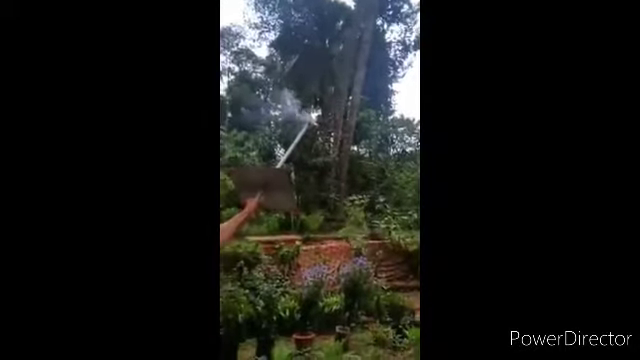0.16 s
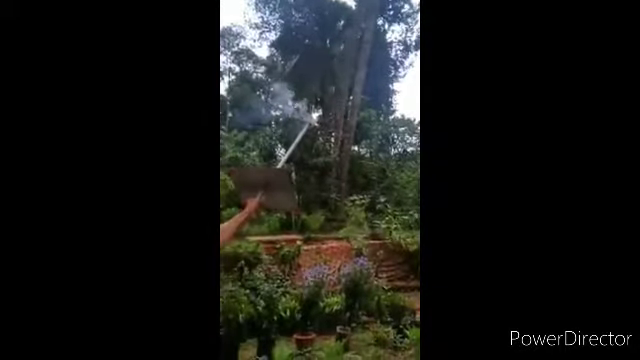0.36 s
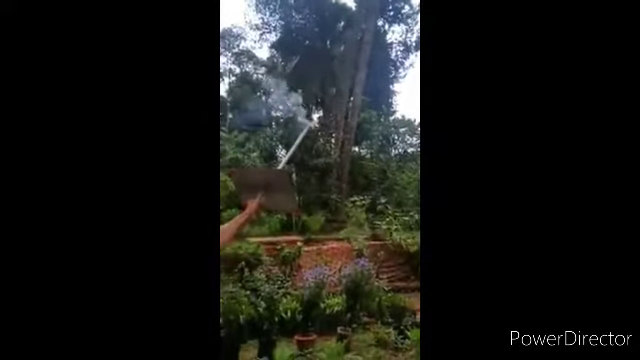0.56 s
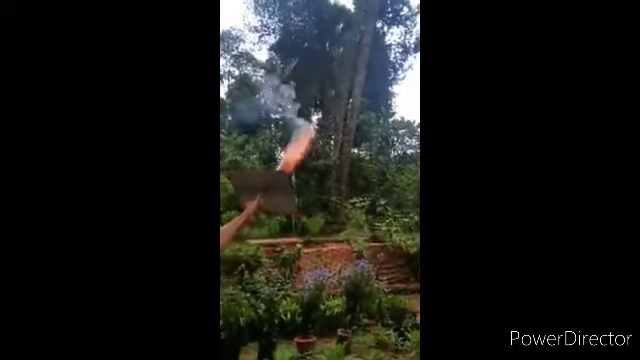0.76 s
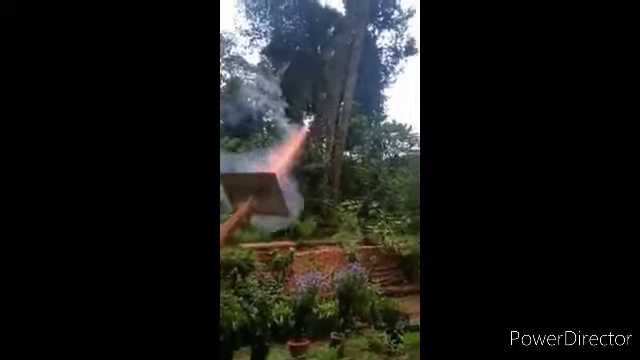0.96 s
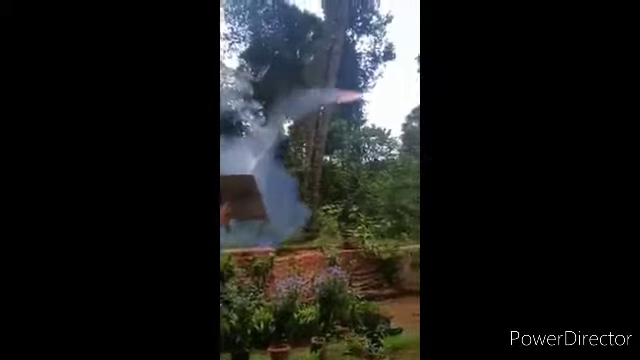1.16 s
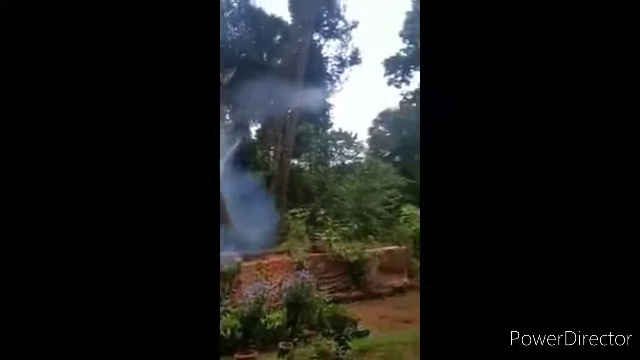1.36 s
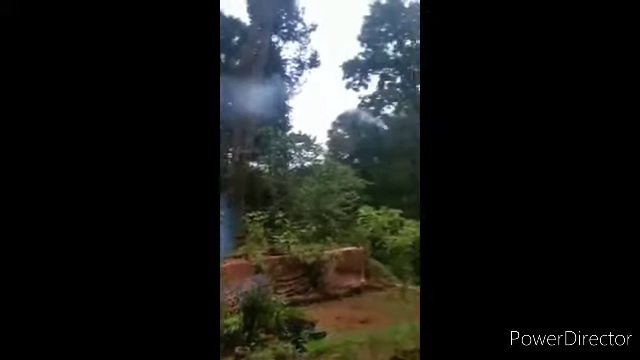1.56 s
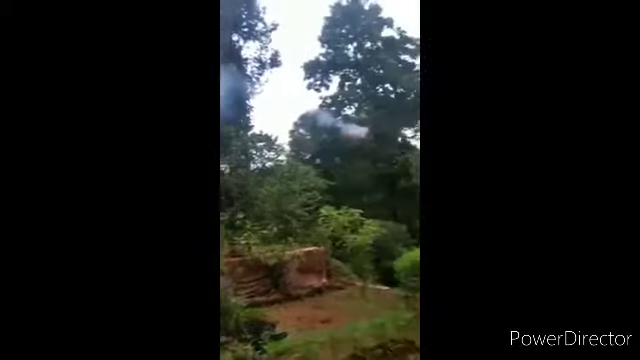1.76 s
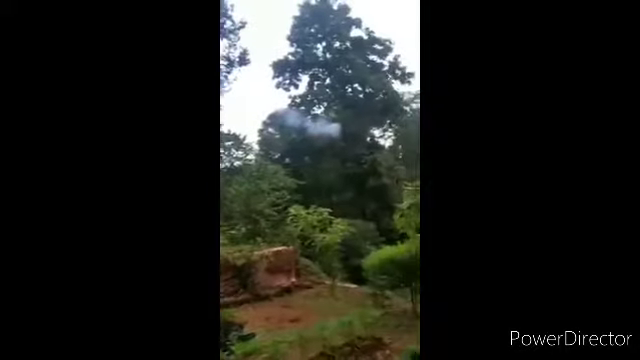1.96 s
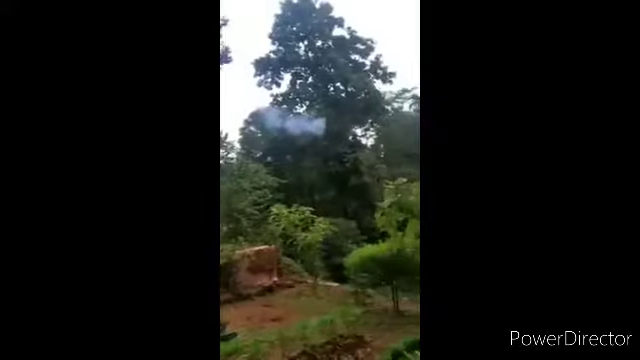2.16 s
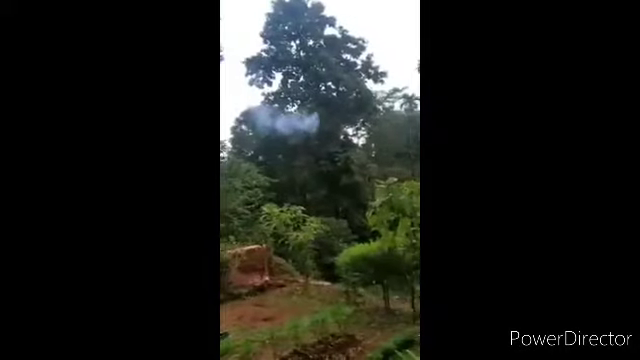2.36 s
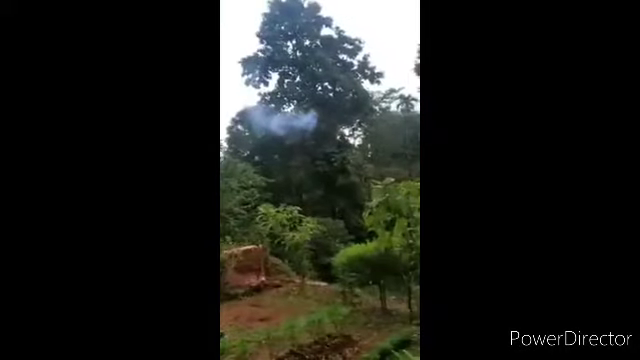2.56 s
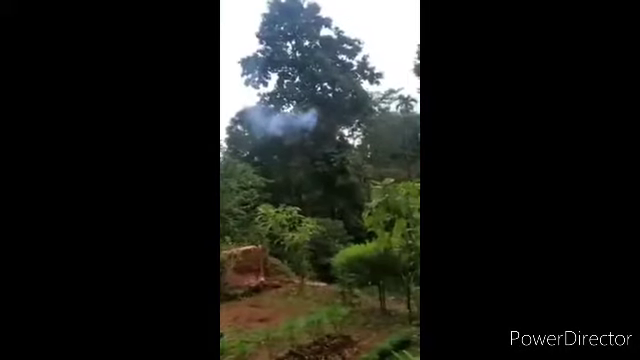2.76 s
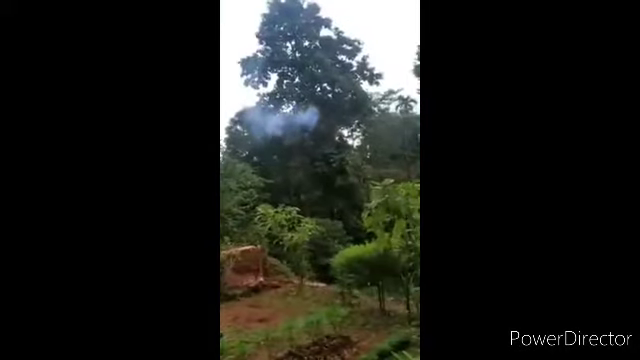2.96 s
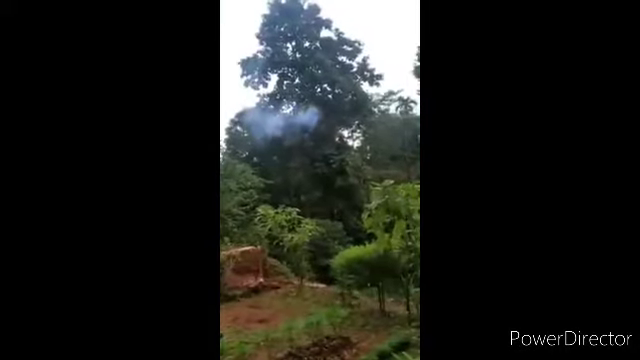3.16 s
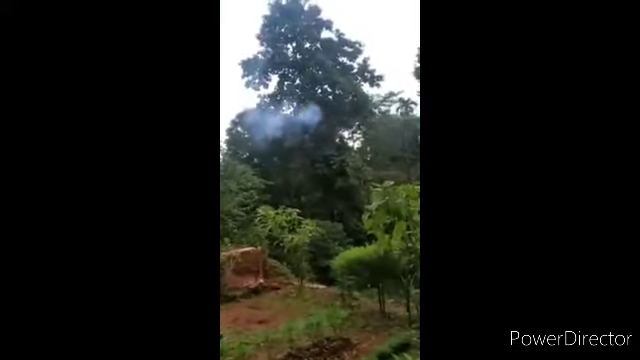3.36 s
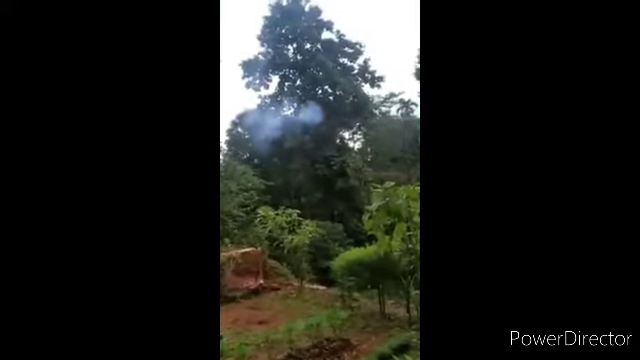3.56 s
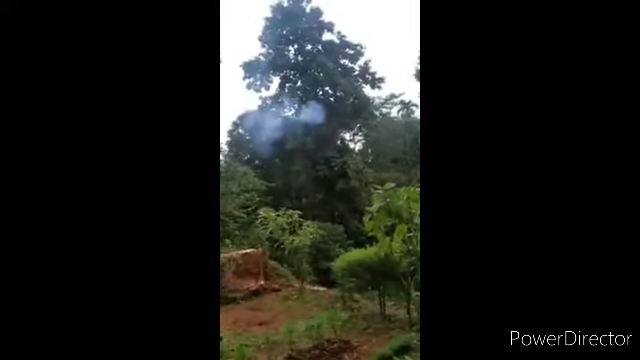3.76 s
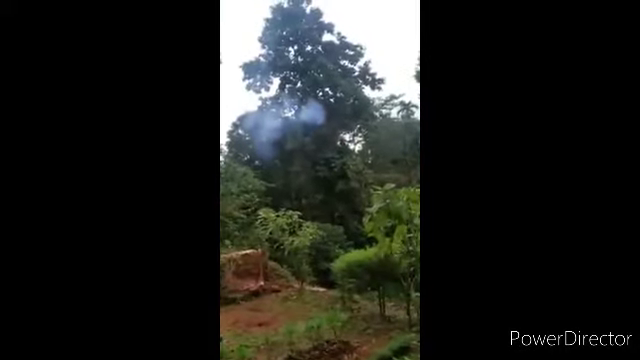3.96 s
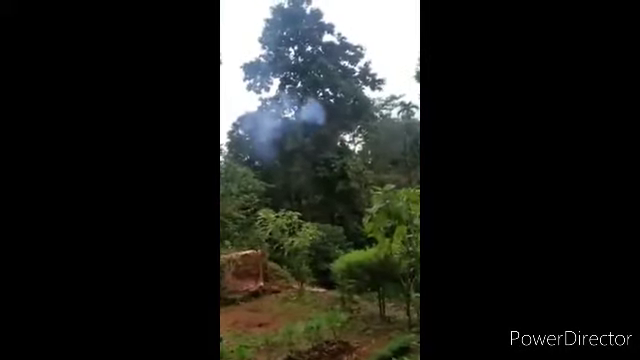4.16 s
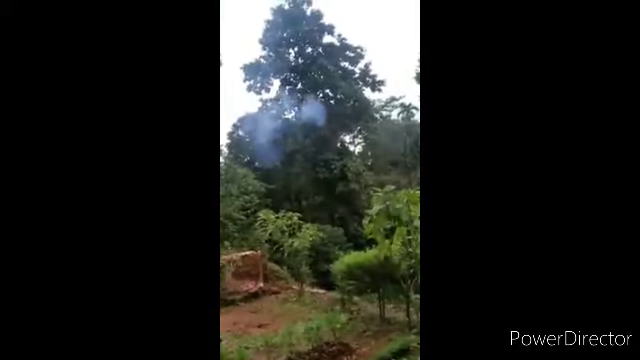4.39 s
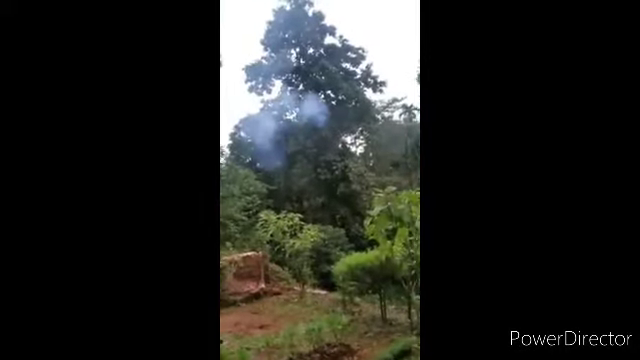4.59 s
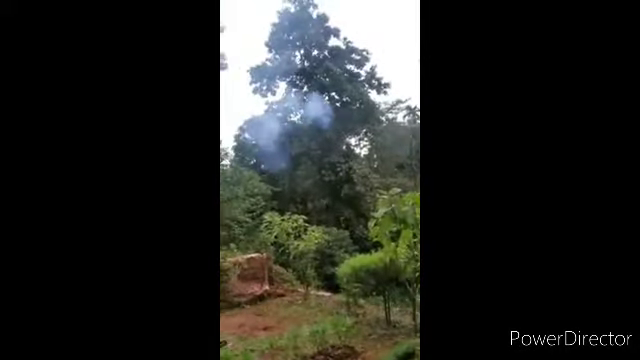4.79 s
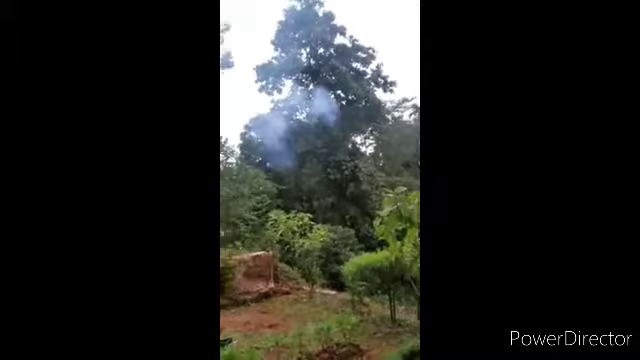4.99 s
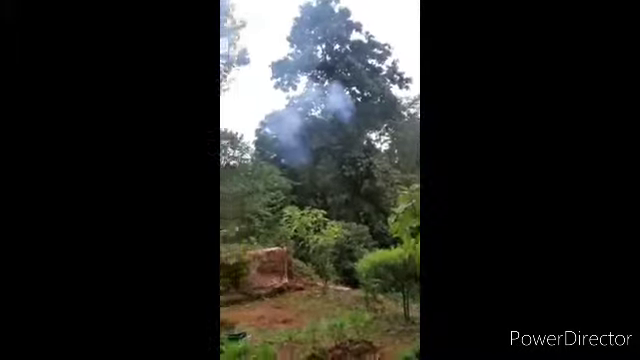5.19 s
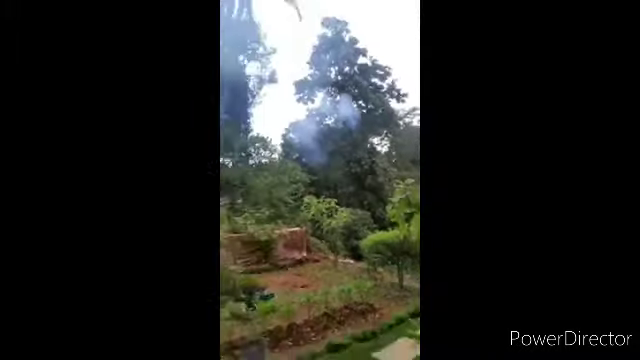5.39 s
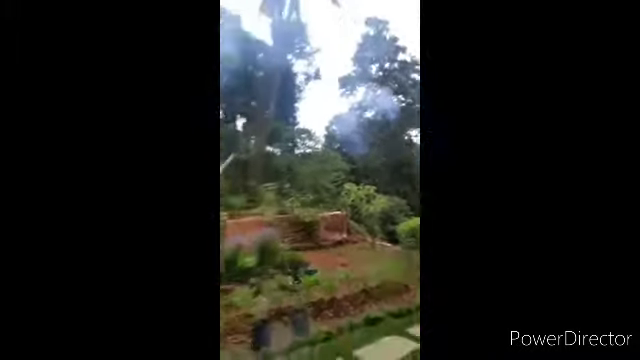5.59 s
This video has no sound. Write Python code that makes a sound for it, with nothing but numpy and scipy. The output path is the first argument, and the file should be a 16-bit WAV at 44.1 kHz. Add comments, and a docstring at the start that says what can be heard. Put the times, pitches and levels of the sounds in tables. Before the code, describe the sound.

A rocket launches from a pipe with a pop and hiss, then explodes loudly, echoing among trees while insects keep buzzing.

```python
"""Insects shrill in a wooded garden, and a hand gives the camera a few soft knocks.
A firework's fuse spits in a hand-held pipe; the motor pops alight and the rocket hisses away.
It bursts above the trees with a bang that overloads the microphones, and the forest scatters it
into a long, darkening roll. The insects sing on; near the end come two more knocks and a nail's tap."""
import sys
import numpy as np
from scipy import signal
from scipy.fft import rfft, irfft, next_fast_len
from scipy.io import wavfile
from scipy.ndimage import uniform_filter1d, map_coordinates

SR = 44100
rng = np.random.default_rng(int(sys.argv[2]) if len(sys.argv) > 2 else 0)


def inscribe(sig):
    """Save sig as 16-bit PCM at rate SR to the path in sys.argv[1].

    A 1-D sig is mono; a 2-D sig holds one channel per row.
    Samples are clipped to [-1, 1] before scaling.
    """
    pcm = np.round(np.clip(np.atleast_2d(sig).T, -1, 1) * 32767)
    wavfile.write(sys.argv[1], SR, pcm.astype(np.int16))


N = 248569
TIME = np.arange(N) / SR
LIGHT_S, BURST_S = 1.114, 1.9996  # the motor lights, the rocket bursts

# Tone colours, from low to high pitch; only the shape counts: (f/Hz, level/dB)
INSECT_TONE = [(1200, -22.5), (1600, -12.5), (1950, -4.5), (2400, 1), (3100, 2.5), (3700, 0), (5000, -0.7),
               (6000, -6), (6700, -13), (7800, -18.5), (8600, -39.5), (10200, -17.5), (11200, -24.5),
               (13700, -27.5), (15000, -48)]
LEAF_TONE = [(4000, -21), (7500, 0), (8600, -14), (10200, -1.5), (13000, -7.5), (14200, -14.5),
             (15400, -30)]
AIR_TONE = [(20, 0.5), (44, -5.5), (65, -10), (100, -6), (160, -13.5), (300, -26.5), (700, -30),
            (1500, -25), (4000, -56.5)]
SKIN_TONE = [(30, 11.5), (110, 3), (250, -7.5), (600, -11.5), (1100, -25), (2000, -24.5), (4000, -39),
             (15000, -69.5)]
SMOULDER_TONE = [(200, -20), (480, -6), (660, -11), (820, 2.5), (1000, -9), (1300, -5), (3000, -8),
                 (8000, -30)]
SPIT_TONE = [(3000, -33), (7000, 5), (9000, 4), (10500, 13), (13000, 10), (15500, -8)]
GAS_TONE = [(90, -15), (250, 0), (700, -4), (1600, -1), (3000, -5), (7000, -1.5), (12000, -14)]
PIPE_TONE = [(50, -18), (110, -8), (190, 4.5), (280, 0), (500, 0), (1200, -8), (3000, -1), (6000, -15),
             (15000, -14)]
HISS_TONE = [(2500, -30.5), (4000, -11), (5600, -2.5), (7000, 0.5), (8600, -1), (10500, -2), (11500, -6.5),
             (13000, -3), (15400, -5.5)]
ROAR_TONE = [(50, -25), (130, -8), (300, -4), (700, 0), (1200, 2.5), (2000, 4.5), (2800, 6), (4000, 4.5),
             (5200, 2), (7000, -8.5), (11000, -30.5)]
RIP_TONE = [(300, -9), (1100, 13), (2200, -3), (5000, -2), (9000, -6), (13000, -14), (15000, -24)]
FOREST_TONE = [(25, -21), (60, -18), (120, -11), (220, -6), (400, -4.3), (650, -3), (1050, -6.2),
               (1500, -10.8), (2700, -10.2), (4300, -13), (6000, -14), (7800, -16.5), (9200, -18),
               (13000, -23.5), (14600, -29), (15300, -46)]
GROUND_TONE = [(25, 0.5), (60, -12), (95, 2.5), (300, -2), (1200, -6.5), (2200, -17.5), (12000, -33.5)]
HILL_TONE = [(30, -19.5), (100, -7), (300, -4), (600, -9), (1100, -19.5), (2200, -35), (12000, -80.5)]
TREE_LINE_TONE = [(100, -18.5), (300, 2), (680, 10.5), (1150, -2.5), (2200, -5.5), (6000, -30.5),
                  (14000, -39)]
BOOM_TONE = [(30, -17.5), (60, -4.5), (90, 0), (135, -2), (220, -17), (500, -50)]
NAIL_TONE = [(100, 2), (700, 7), (1500, -4), (5000, -21), (10000, -7), (15000, -15)]
# How wide sounds seem, as the side signal's level against the middle's: (f/Hz, level/dB)
GARDEN_WIDTH = [(40, -16.5), (200, -17.5), (1000, -5), (2700, 1), (5000, -0.5)]
JET_WIDTH = [(150, -30), (700, -7.5), (1300, 0), (2500, 0), (3400, 7), (4500, 7), (6200, -1), (9000, -1.5),
             (15000, 0)]
ECHO_WIDTH = [(50, -14), (125, -20), (220, -18), (380, -13), (700, -8), (1200, -3), (2200, 0), (4500, 1),
              (9000, -1.5), (14000, -1)]

# The insects' shrill notes: (f/Hz, width/Hz, relative level/dB)
SHRILL_NOTES = [(2762, 30, -2), (3048, 22, -11)]
# The shrill notes, or the whole chorus, swell briefly: (t/s, half length/s, boost/dB)
NOTE_SWELLS = [(.05, 0.04, 3.5), (2.79, .03, 4.5), (3.83, .1, 3.5), (4.591, 0.03, 5.5), (5.173, 0.045, 6)]
CHORUS_SWELLS = [(3.96, 0.047, 2), (4.79, .11, 2.3), (5.255, 0.049, 5)]
# Leaves stir close by: (t/s, level/dB)
LEAF_STIRS = [(.06, -56.5), (3.31, -54.5), (3.9, -62), (4.88, -60.5)]
# A faint deep drone comes and goes: (t/s, half length/s)
DRONE_SWELLS = [(0.324, 0.066), (0.547, 0.1), (1.8, 0.16), (3.044, 0.19), (4.28, 0.16), (5.348, 0.074),
                (5.58, 0.12)]
# Knocks on the camera: (t/s, relative level/dB, push length/s)
KNOCKS = [(0.071, -33, .004), (0.157, -20.5, 0.0023), (4.428, -30.5, 0.0052), (4.837, -28.5, 0.0063)]
# The hand lies nearer the right microphone; rows are left and right: (gain/dB)
HAND_BALANCE = [
    [-17.5],
    [5.3],
]
# The fuse flares: (t/s, half length/s, boost/dB)
FUSE_FLARES = [(0.983, 0.015, 1), (1.1, .016, 4)]
# The motor catches in the pipe: (t/s, level/dB, time to fade 60 dB/s)
COUGHS = [(1.093, -29.5, 0.17), (1.114, -26, 0.25)]
# The rocket gains thrust, then draws away: (t/s, relative hiss level/dB, relative roar level/dB)
EXHAUST_LEVELS = [(1.14, -31.5, -34.5), (1.184, -29, -35.5), (1.234, -23, -28.5), (1.404, -18, -26.5),
                  (1.554, -18, -25), (1.624, -22.5, -29.5), (1.658, -20, -30), (1.704, -25.5, -32),
                  (1.975, -33.5, -39)]
# Ground and terrace walls reflect the shock: (delay/s, level against the direct shock/dB)
WALL_ECHOES = [(.0032, 4.5), (.004, 3), (.0117, -10), (.032, -6)]
# The forest's echo holds (f/Hz, time at full strength/s), then dies (f/Hz, time to fade 60 dB/s)
FOREST_HOLD = [(40, 0.036), (120, 0.16), (300, 0.24), (700, 0.31), (2000, 0.24), (5000, 0.23),
               (12000, 0.21)]
FOREST_FADE = [(40, 1.5), (150, 1.65), (500, 1.4), (1000, 1.3), (2000, 1.15), (5000, .92), (8000, .85),
               (12000, .62)]
# Echoes from tall trees, and deep booms under them: (t/s, half length/s, level/dB)
TREE_ECHOES = [(2.27, 0.071, -20.5), (2.367, 0.015, -27.5), (2.5, 0.022, -36), (2.61, 0.071, -36),
               (2.85, 0.15, -41.5), (3.187, 0.032, -46.5)]
BOOMS = [(2.15, .04, -33.5), (2.245, 0.025, -33.5), (2.34, 0.031, -35), (2.49, 0.021, -38)]
# The notes the camera's shell rings with: (f/Hz, relative level/dB, time to fade 60 dB/s)
SHELL_NOTES = [(150, -22, 0.06), (604, 2.5, 0.011), (794, -12, 0.04), (1420, 1, 0.0035), (9600, -22, .008)]
# The microphone openings lift or dip some pitches: (f/Hz, width/Hz, gain/dB)
MIC_COLOUR = [(1180, 130, 1.5), (2750, 300, 1.5), (6650, 170, -2), (7980, 200, 2), (8550, 300, -2),
              (11500, 500, -2)]


def amp(db):
    """Turn decibels into a gain."""
    return 10 ** (np.asarray(db) / 20)


def unit(x):
    """Scale a signal to an average power of 1."""
    return x / np.sqrt(np.mean(x ** 2) + 1e-20)


def along(points, hz):
    """Read between the rows of a (frequency, value) table, on a log scale of frequency."""
    f, values = np.transpose(points)
    return np.interp(np.log(hz + 1), np.log(f + 1), values)


def wobble(rate):
    """A smooth curve through `rate` random points a second."""
    return map_coordinates(rng.standard_normal(int(N * rate / SR) + 4), [TIME * rate])


def swell(s, half, flatness=4):
    """A rounded hump of height 1, centred on time s."""
    return np.exp(-((TIME - s) / half) ** flatness)


def boost_db(rows):
    """Add up brief rises in level."""
    return sum(db * swell(s, half) for s, half, db in rows)


def peak(s, rise, fall):
    """A gain that climbs to 1 at time s, then drops; rise and fall are in dB a second."""
    return amp(-rise * np.maximum(s - TIME, 0) - fall * np.maximum(TIME - s, 0))


def push(s, length, rise):
    """A pressure wave: a steep push, then a longer suction."""
    age = np.maximum(TIME - s, 0)
    return (1 - age / length) * np.exp(-age / length) * (1 - np.exp(-age / rise))


def filtered(x, response):
    """Give each frequency in x its own gain."""
    size = next_fast_len(N + SR // 2)
    return irfft(rfft(x, size) * response(np.fft.rfftfreq(size, 1 / SR)), size)[..., :N]


def shaded(x, gain):
    """Give x a gain that depends on both frequency and time."""
    hz, t, spectrum = signal.stft(x, SR, nperseg=512)
    return signal.istft(spectrum * gain(hz[:, None], t[None]), SR, nperseg=512)[1][:, :N]


def noise(tone, width, flicker=1):
    """Left and right noise with a given tone colour and width, at an average power of 1."""
    def colour(hz):
        side = amp(along(width, hz))
        return amp(along(tone, hz)) * np.array([np.ones_like(side), side]) / np.hypot(1, side)
    mid, side = filtered(rng.standard_normal((2, N)) * flicker, colour)
    return unit(np.array([mid + side, mid - side]))


def shrill(hz, width, drift_hz=18, trill_hz=26, trill_db=2, count=4):
    """A few insects on nearly one pitch, each wandering and chirping at its own uneven pace."""
    voices = np.zeros((2, N))
    for _ in range(count):
        pitch = hz + drift_hz * wobble(9) + .7 * width * wobble(90)
        pulses = np.sin(2 * np.pi * np.cumsum(trill_hz * (1 + .3 * wobble(8))) / SR)
        mic_phase = rng.normal(0, 0.57, (2, 1))
        loudness = amp(trill_db * pulses + 1.5 * wobble(21) + 3.2 * wobble(220))
        voices += loudness * np.sin(2 * np.pi * np.cumsum(pitch) / SR + mic_phase)
    return unit(voices)


def buzz(hz=2750, width_hz=110, db=-52, ease_db_per_s=1.5):
    """Many far insects blur into one narrow buzz that slowly eases off."""
    band = filtered(rng.standard_normal((2, N)), lambda f: 1 / (1 + ((f - hz) / width_hz) ** 4))
    return amp(db - ease_db_per_s * TIME) * unit(band)


def insects(chorus_db=-39, ease_db_per_s=0.67, shrill_db=-47.5):
    """A far, blended chorus surges now and then, with two shrill notes standing out of it."""
    level_db = chorus_db - ease_db_per_s * TIME + boost_db(CHORUS_SWELLS)
    chorus = amp(level_db + 1.01 * wobble(45)) * noise(INSECT_TONE, GARDEN_WIDTH)
    notes = sum(amp(db) * shrill(hz, width) for hz, width, db in SHRILL_NOTES)
    return chorus + buzz() + amp(shrill_db + boost_db(NOTE_SWELLS) - 0.1 * wobble(6.8)) * notes


def garden(air_db=-63, drone_db=-52.5, drone_hz=43):
    """Leaves stir quickly and settle slowly, over low moving air and a faint deep drone."""
    stirring = sum(amp(db) * peak(s, rise=130, fall=34.5) for s, db in LEAF_STIRS)
    leaves = stirring * amp(2.1 * wobble(40)) * noise(LEAF_TONE, GARDEN_WIDTH)
    air = amp(air_db + 1.2 * wobble(7.2)) * noise(AIR_TONE, GARDEN_WIDTH)
    drone_gain = amp(drone_db) * sum(swell(s, half) for s, half in DRONE_SWELLS)
    drone = drone_gain * np.sin(2 * np.pi * drone_hz * TIME + .5 * wobble(9.8))
    return leaves + air + drone


def hand(dull_hz=420, softness=0.78):
    """Fingers shift on the camera: dull knocks, with a rub of skin that grows around each one."""
    pushes = sum(amp(db) * push(s, length, softness * length) for s, db, length in KNOCKS)
    knocks = filtered(pushes, lambda f: 1 / (1 + 1j * f / dull_hz - (f / dull_hz) ** 2))
    shifting = sum(peak(s, rise=50, fall=50) for s, _, _ in KNOCKS)
    rub_gain = (amp(-72) + amp(-68) * shifting) * amp(2.8 * wobble(32))
    return knocks + rub_gain * noise(SKIN_TONE, GARDEN_WIDTH)[0]


def fuse(spit_s=0.97, spit_db=-44.5, smoulder_db=-57):
    """The fuse smoulders in the pipe, then spits thinly and flares twice as the motor takes over."""
    burning = peak(spit_s, rise=260, fall=0) * peak(LIGHT_S, rise=0, fall=150)
    flicker_db = boost_db(FUSE_FLARES) + .8 * wobble(89.7) + 1.3 * wobble(900)
    spit = burning * amp(spit_db + flicker_db) * noise(SPIT_TONE, JET_WIDTH)
    smoulder = amp(smoulder_db) * peak(LIGHT_S, rise=22, fall=150) * noise(SMOULDER_TONE, ECHO_WIDTH)
    return spit + smoulder


def ignition(gas_db=-38.5, pop_db=-14, rise_s=0.0017):
    """Gas wells up, the motor coughs twice, and a pressure wave pops out of the pipe."""
    gas = amp(gas_db) * swell(1.088, half=.042, flatness=2) * noise(GAS_TONE, ECHO_WIDTH)
    coughs = sum(amp(db) * peak(s, rise=0, fall=60 / fade_s) * np.clip((TIME - s) / rise_s, 0, 1)
                 for s, db, fade_s in COUGHS)
    pop = amp(pop_db) * push(LIGHT_S + rise_s / 2, length=.0004, rise=.00004)
    return gas + pop + coughs * noise(PIPE_TONE, ECHO_WIDTH)


def jet(gain_db=3, sputter_db=1.0, rasp_db=0.7, patchy_db=2.5):
    """The swirling exhaust hisses and roars, sputtering finely, until the burst ends it."""
    def eddies(hz, t):
        patches = rng.standard_normal((hz.size, t.size))
        patches = uniform_filter1d(patches, size=2, axis=0)
        patches = uniform_filter1d(patches, size=6, axis=1)
        return amp(patchy_db * unit(patches))
    alight = amp(gain_db) * peak(LIGHT_S, rise=1200, fall=0) * peak(BURST_S, rise=0, fall=300)
    s, hiss_db, roar_db = np.transpose(EXHAUST_LEVELS)
    hiss = amp(np.interp(TIME, s, hiss_db)) * noise(HISS_TONE, JET_WIDTH)
    roar = amp(np.interp(TIME, s, roar_db) + rasp_db * wobble(260)) * noise(ROAR_TONE, JET_WIDTH)
    sputter = amp(0.03 * wobble(46) + sputter_db * wobble(1200))
    return shaded((hiss + roar) * alight * sputter, eddies)


def add_bounces(x, share=0.24, count=4):
    """Ground and terrace walls add weak copies that lag more and more as the rocket climbs."""
    lag = .0035 + .0008 * np.maximum(TIME - LIGHT_S, 0)
    copies = np.zeros((2, N))
    for stretch in rng.uniform(1, 3.5, count):
        copies += [map_coordinates(channel, [(TIME - stretch * lag) * SR]) for channel in x]
    return (x + share * copies) / np.sqrt(1 + count * share ** 2)


def crack(db=-8.5, fade_s=.049, early_s=.001, rise_s=0.00088):
    """The rocket's casing tears open with a short, bright rip."""
    age = np.maximum(TIME - BURST_S + early_s, 0)
    shape = np.clip(age / rise_s, 0, 1) * amp(db - 60 * age / fade_s)
    return shape * noise(RIP_TONE, ECHO_WIDTH)


def blast(gain_db=6.5, bark_hz=900, mic_lag_s=0.00017):
    """The shock wave and its echoes off walls and trunks reach the two microphones a little apart."""
    def colour(f):
        bark = 1j * f * bark_hz / (bark_hz ** 2 - f * f + 1j * f * bark_hz)  # a hard middle range
        treble_cut = 1 / (1 + 1j * f / 4200) / (1 + 1j * f / 9000)
        bass_cut = 1j * f / (105 + 1j * f)
        return (1 + 1.3 * bark) * treble_cut * bass_cut
    direct = [(0.0007, 0)]
    trunks = [(delay, -18) for delay in rng.uniform(0.0042, 0.029, 6)]
    waves = np.zeros((2, N))
    for delay, db in direct + list(WALL_ECHOES) + trunks:
        lag = mic_lag_s * rng.uniform(-1.1, 1)
        pair = [push(BURST_S + delay + side * lag, length=0.00058, rise=0.00033) for side in (1, -1)]
        waves += amp(gain_db + db) * np.array(pair)
    return filtered(waves, colour)


def mic_thump(db=-18):
    """A deep, one-sided thump as the shock presses on the right microphone's opening."""
    return np.array([np.zeros(N), -amp(db) * push(BURST_S, length=.04, rise=.002)])


def echoes(forest_db=-14.5, ground_db=-10, ground_fade_s=0.26, hills_db=-31, hills_fade_s=4.52):
    """The ground thuds, far slopes roll, and countless trunks and leaves return the bang."""
    def dying(hz, t):
        # The treble comes from the nearer trees and dies first.
        overdue = t - BURST_S - along(FOREST_HOLD, hz)
        fading_s = np.logaddexp(0, overdue / .03) * .03  # eases from holding into fading
        return amp(-60 * fading_s / along(FOREST_FADE, hz))
    age = np.maximum(TIME - BURST_S, 0)
    clumps = amp(1.4 * wobble(900) + .7 * wobble(70))  # echoes overlap in small, quick bunches
    build_up_db = -6 * np.exp(-age / 0.021)
    forest = shaded(noise(FOREST_TONE, ECHO_WIDTH, clumps), dying) * amp(forest_db + build_up_db)
    ground = noise(GROUND_TONE, ECHO_WIDTH) * amp(ground_db - 60 * age / ground_fade_s)
    hills = noise(HILL_TONE, ECHO_WIDTH) * amp(hills_db - 60 * age / hills_fade_s + wobble(6.1))
    return (forest + ground + hills) * np.clip(age / 0.0024, 0, 1)


def tree_line():
    """Each stand of tall trees sends back a hollow swell, weaker from farther off, over deep booms."""
    def swells(rows):
        return sum(amp(db) * swell(s, half, flatness=2) for s, half, db in rows)
    hollow = amp(1.4 * wobble(160)) * swells(TREE_ECHOES) * noise(TREE_LINE_TONE, ECHO_WIDTH)
    return hollow + swells(BOOMS) * noise(BOOM_TONE, ECHO_WIDTH)


def nail_tap(s=4.9042, tick_fade_s=0.053):
    """A fingernail brushes the camera's shell, then clicks on it and makes it ring briefly."""
    age = np.maximum(TIME - s, 0)
    ring = sum(amp(db - 60 * age / fade_s) * np.sin(2 * np.pi * hz * age)
               for hz, db, fade_s in SHELL_NOTES)
    brush = amp(-53) * peak(s, rise=220, fall=220)
    tick = (age > 0) * amp(-45 - 60 * age / tick_fade_s)
    return amp(-26.5) * ring + (brush + tick) * noise(NAIL_TONE, GARDEN_WIDTH)[0]


def scene(left_lead_s=.00007):
    """Mix launch, bang, garden and hand; the echoes reach the left microphone a little sooner."""
    launch = fuse() + ignition() + add_bounces(jet())
    bang = blast() + mic_thump() + crack()
    sides = np.array([[1], [-1]])
    roll = filtered(echoes() + tree_line(), lambda hz: np.exp(1j * np.pi * hz * left_lead_s * sides))
    background = garden() + insects()
    handling = (hand() + nail_tap()) * amp(HAND_BALANCE)
    return launch + bang + roll + background + handling


def record(dry, ceiling=0.84, top_hz=15500):
    """The microphones colour the sound and round off its loudest peaks; the highest treble is cut."""
    def colour(f):
        return amp(sum(db * np.exp(-((f - hz) / width) ** 2) for hz, width, db in MIC_COLOUR))
    coloured = filtered(dry, colour)
    rounded = coloured / (1 + np.abs(coloured / ceiling) ** 4) ** (1 / 4)
    return filtered(rounded, lambda hz: .5 - .5 * np.tanh((hz - top_hz) / 70))


dry = scene()
out = record(dry)
inscribe(out)
```